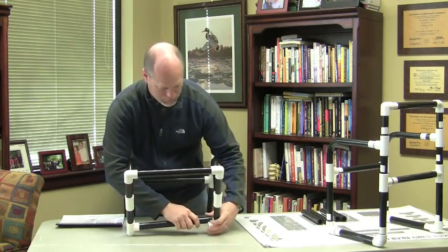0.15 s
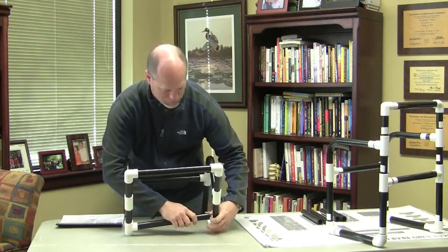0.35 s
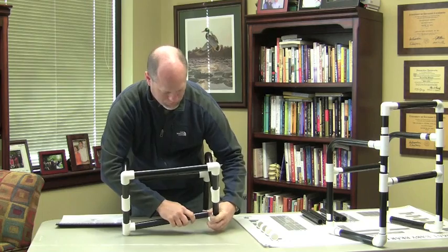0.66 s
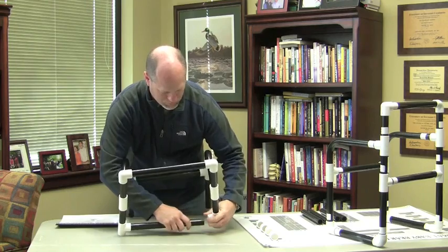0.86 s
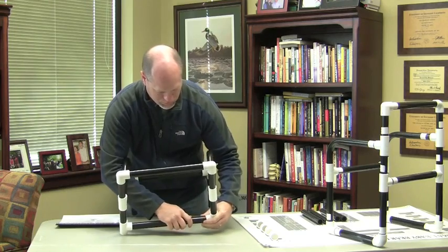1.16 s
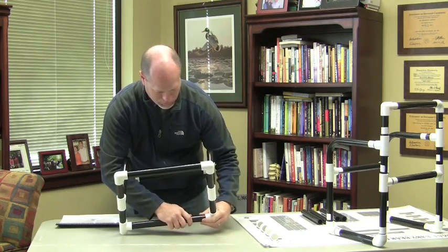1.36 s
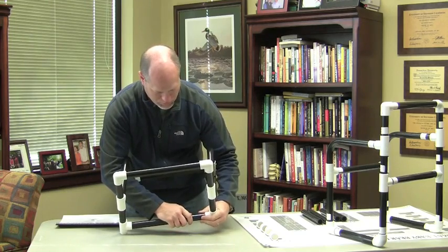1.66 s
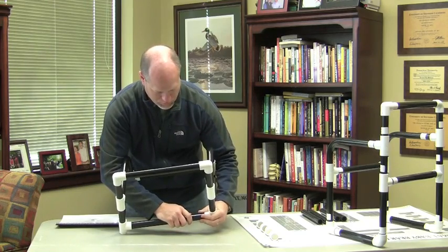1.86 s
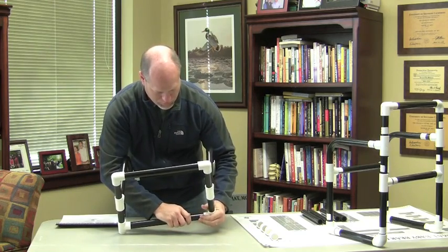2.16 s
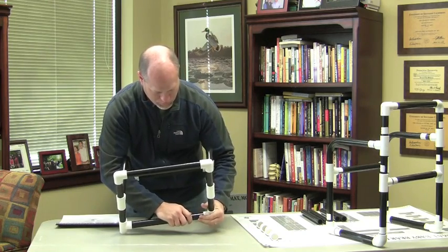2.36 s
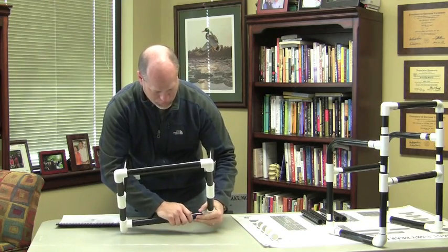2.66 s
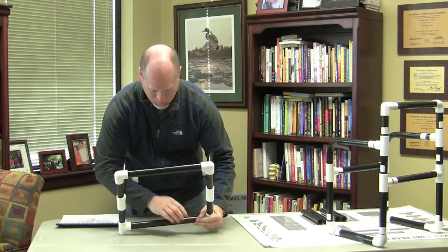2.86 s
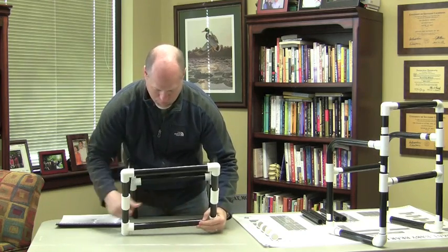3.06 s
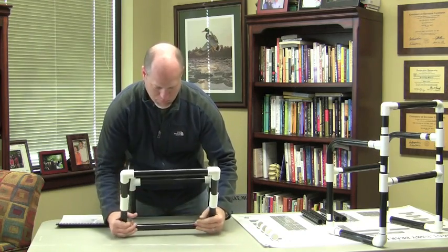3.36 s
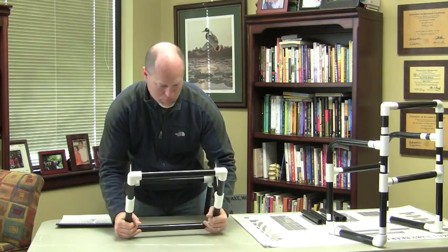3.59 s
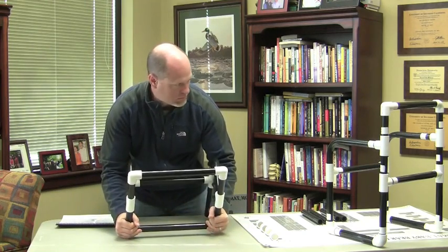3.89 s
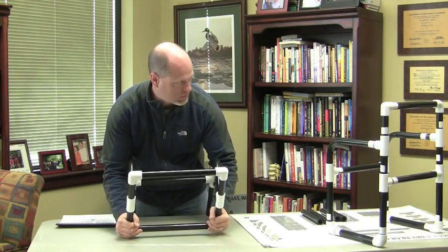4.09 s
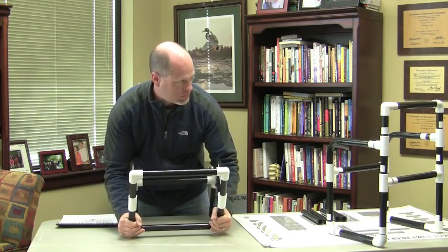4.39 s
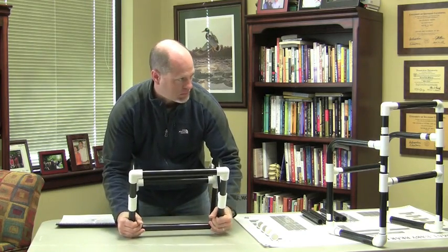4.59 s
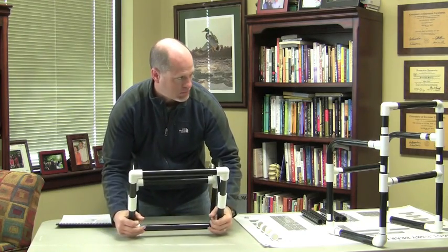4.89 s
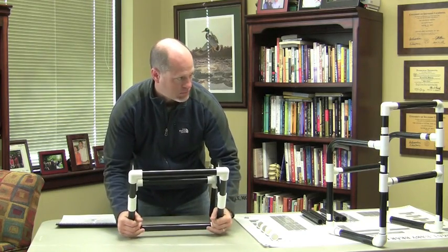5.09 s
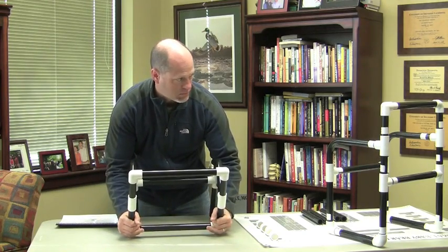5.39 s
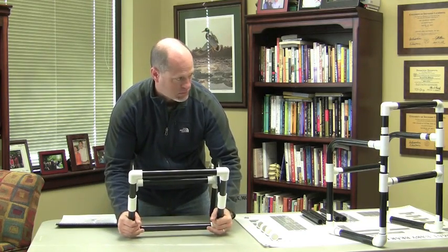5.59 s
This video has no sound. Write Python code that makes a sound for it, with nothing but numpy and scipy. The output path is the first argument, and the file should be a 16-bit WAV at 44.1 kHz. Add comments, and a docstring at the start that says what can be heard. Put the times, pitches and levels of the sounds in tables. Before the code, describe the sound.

A mono recording from across a small office, with a steady low ventilation rumble, faint motor hum and soft hiss. At about 0.1 s a dragged foot gives a tiny falling judder on the table. Plastic joints click, growing into a tight cluster of sharp cracks at 0.7-0.85 s, then a heavy hollow knock with quick follow-ups at 0.95-1.0 s. Smaller snaps scatter at 1.2-1.65 s, and a quieter gap follows. A strong crack and thump lands at 2.35 s, lighter clicks at 2.55 s, a knock at 2.8 s and another snap near 3.1 s. Blunt feet land in a rapid clatter around 3.4 s. Lighter snaps at 3.65-3.95 s lead to a final flurry at 4.2-4.35 s. Afterwards only faint ticks and small taps around 4.65 and 5.1 s remain. Sleeves rustle faintly throughout; thumps are boxy and brief, with short room reflections.

```python
"""Plastic pipes on a folding table

Place: a small office, where a frame of plastic pipes is pushed together by hand on a folding table.
Joints slip and snap as cracks with damped pipe ring; feet knock the modes of the hollow table top.
One foot judders, the table sways, and sleeves rustle as shaped noise; ventilation is noise with hum.
Distance: far enough that each click holds more room than direct sound. One small microphone, mono."""
import sys
import numpy as np
from scipy import signal
from scipy.fft import rfft, irfft, next_fast_len
from scipy.io import wavfile

SR = 44100
rng = np.random.default_rng(int(sys.argv[2]) if len(sys.argv) > 2 else 0)


def unload_wav(signal):
    """Save mono or channel-first audio to the path in sys.argv[1] as 16-bit WAV at rate SR, clipped to [-1, 1]."""
    wavfile.write(
        sys.argv[1],
        SR,
        np.round(np.clip(np.atleast_2d(signal).T, -1, 1) * 32767).astype(np.int16),
    )


N = 253134  # length of the scene in samples
RING = 32768  # longest ring or echo of one contact in samples

# a stronger snap is slightly brighter: contact hardness at the reference level, and its rise
SNAP_HARDNESS_HZ, SNAP_REFERENCE_DB, HARDNESS_OCTAVES_PER_DB = 3750, -31.5, 0.01
# a joint gives a little just before it snaps: typical lead, and level against the snap
FIRST_GIVE_S, FIRST_GIVE_DB = 0.0032, -11

# Joints slipping and snapping. Each row: start in seconds, pipe click in relative dB,
# table thump in relative dB.
JOINT_SNAPS = [(.059, -41, -29.5), (.308, -35, -25), (.4435, -23, -23.5), (.555, -27.5, -25),
               (.695, -35, -35), (.743, -29.5, -23), (.8, -28.5, -45), (.823, -21.5, -23.5),
               (.832, -28.5, -29), (1.169, -39, -26.5), (1.386, -26.5, -26.5), (1.5305, -29, -29.5),
               (1.571, -29, -25), (1.631, -32.5, -26), (1.645, -31, -25), (1.663, -26.5, -23.5),
               (2.344, -21, -22.5), (2.352, -22, -13), (2.5395, -24, -32.5), (2.554, -25, -44),
               (3.07, -27.5, -18.5), (3.156, -41.5, -38), (3.657, -37.5, -25), (3.748, -31, -32.5),
               (3.807, -36.5, -27.5), (3.852, -25, -22.5), (3.941, -37.5, -26.5), (4.076, -39.5, -31.5),
               (4.18, -34, -45), (4.192, -28, -24), (4.256, -34.5, -30), (4.288, -26.5, -23.5),
               (4.308, -31.5, -22), (4.335, -23, -21), (4.42, -42.5, -28.5)]


def joints(crack, pipes, table, click_db=30.5, thump_db=31, click_wet_db=5, thump_wet_db=2):
    """Pipes give a little, then snap deeper into their fittings; each snap jolts the table."""
    out = np.zeros(N + RING)
    for start_s, pipe_db, table_db in list(JOINT_SNAPS) + ticks():
        tail = office()
        octaves = HARDNESS_OCTAVES_PER_DB * (pipe_db - SNAP_REFERENCE_DB)
        hardness_hz = SNAP_HARDNESS_HZ * 2 ** octaves
        first_give = (FIRST_GIVE_S * rng.uniform(0.7, 1.3), FIRST_GIVE_DB, office())
        snap = (0, 0, tail)
        for lead_s, jerk_db, echoes in (first_give, snap):
            click = pipe_click(crack, pipes, echoes, click_wet_db)
            click = soften(click, hardness_hz, order=2)
            add(out, start_s - lead_s, from_db(pipe_db + jerk_db + click_db) * click)
        thump = in_room(strike(table, spread_db=1.5), tail, thump_wet_db)
        add(out, start_s, from_db(table_db + thump_db) * thump)
    return out[:N]


# the strained joints also tick: rate, end, then levels on the scale of the snaps
TICKS_PER_S, TICKS_END_S = 4.5, 4.9
TICK_DB, TICK_SPREAD_DB, TICK_THUMP_DB = -51.5, 5, -44.5


def ticks():
    """Faint slips, one at a random moment of each equal time slot, as rows like those of the snaps."""
    count = int(TICKS_PER_S * TICKS_END_S)
    when, size = rng.random((count, 2)).T
    start_s = (np.arange(count) + when) / TICKS_PER_S
    size_db = TICK_SPREAD_DB * (2 * size - 1)
    return list(zip(start_s, TICK_DB + size_db, TICK_THUMP_DB + size_db))


# Feet knocking on the table. Each row: start in seconds, pipe click in relative dB,
# table thump in relative dB, contact hardness in Hz, thump tilt in dB per octave.
FOOT_KNOCKS = [(0.086, -43, -30, 1200, 2), (0.199, -49, -28.5, 1470, -1), (.947, -27.5, -9.5, 3550, -1),
               (.962, -39, -12.5, 4200, -2.5), (.988, -39, -18.5, 4200, 1), (1.018, -36, -16.5, 2680, 3.5),
               (1.221, -32.5, -22, 2100, 2), (2.411, -48, -20, 3040, -6), (2.814, -29, -11.5, 3660, -1),
               (2.866, -44.5, -22, 3330, 1), (3.099, -47, -20, 4000, -1.5), (3.361, -22, -11, 2200, 1.5),
               (3.389, -31.5, -12.5, 2100, 2.5), (3.42, -40, -20.5, 2000, 2.5), (3.466, -35, -19, 2760, -3),
               (4.653, -41.5, -34, 2230, 7.5), (5.051, -49, -33.5, 2310, -2),
               (5.118, -43.5, -33, 2200, 4.5)]


def feet(crack, pipes, table, click_db=31, thump_db=30.5, click_wet_db=3, thump_wet_db=-1):
    """Blunt fittings land on the hollow top; where they land tilts the thump from boom to clack."""
    out = np.zeros(N + RING)
    # height of each table mode above the lowest
    octaves = np.log2(np.array(TABLE_TOP_MODES)[:, :1] / TABLE_TOP_MODES[0][0])
    for start_s, pipe_db, table_db, hardness_hz, tilt_db in FOOT_KNOCKS:
        tail = office()
        click = pipe_click(crack, pipes, tail, click_wet_db)
        click = soften(click, hardness_hz, order=3, grit_db=-24.5, bounce=0.24)
        thump = strike(table * from_db(tilt_db * octaves), spread_db=2.5, together=0.13)
        add(out, start_s, from_db(pipe_db + click_db) * click)
        add(out, start_s, from_db(table_db + thump_db) * in_room(thump, tail, thump_wet_db))
    return out[:N]


# The dry crack of a contact. Each row: frequency in Hz, relative level in dB.
CRACK_SPECTRUM = [(150, -7), (500, -7.5), (1000, 1), (1700, 2.5), (2700, 2.5), (4000, 3), (6000, 3),
                  (8000, -0.5), (11000, -2.5), (16000, -8.5)]


def dry_crack():
    """The broadband pulse of two hard surfaces meeting."""
    return pulse(CRACK_SPECTRUM)


# Pipe walls and fittings, heavily damped. Each row: frequency in Hz, relative level in dB,
# 60 dB decay time in seconds.
PIPE_WALL_MODES = [(990, -22, 0.0082), (1117, -2.5, 0.028), (1250, -3.5, 0.026), (1450, -18, 0.032),
                   (1940, -4.5, 0.0066), (2096, 1, 0.038), (2680, -2.5, 0.016), (3020, -15, 0.03),
                   (4050, 2, 0.0081), (4340, 13.5, 0.005), (5500, 11, 0.0012), (6380, 9.5, 0.0089)]


def pipe_walls():
    """The short resonances of the plastic walls."""
    return mode_shapes(PIPE_WALL_MODES)


# The hollow table top. Each row: frequency in Hz, relative level in dB, 60 dB decay time in seconds.
TABLE_TOP_MODES = [(118, -25, 0.073), (136.5, -1.5, 0.15), (157.7, -1.5, 0.21), (175, -6, 0.22),
                   (195.8, 3.5, 0.13), (217.4, -2, 0.17), (243.8, 4.5, 0.16), (267.5, -4, 0.24),
                   (297.2, 3, 0.1), (327.3, 3.5, 0.11), (360.3, -1.5, 0.13), (413.5, -6.5, 0.14),
                   (445, -2.5, 0.071), (497, -1.5, 0.062), (553, -7, 0.075), (628, -2.5, 0.031),
                   (722, -9, 0.045), (808, -2, 0.016), (816, -6, 0.043), (978, -15, 0.062)]


def table_top():
    """The bending resonances of the table top."""
    return mode_shapes(TABLE_TOP_MODES)


def pipe_click(crack, pipes, tail, wet_db, ring_db=-5, room_ring_db=-14):
    """A crack with a short pipe ring; the room gathers all directions, which evens out the ring."""
    ring = strike(pipes, spread_db=7.5)
    near = crack + from_db(ring_db) * ring
    direct = unit_energy(signal.fftconvolve(near, slips())[:RING])
    all_round = crack + from_db(room_ring_db) * ring
    diffuse = unit_energy(signal.fftconvolve(all_round, tail)[:RING])
    return direct + from_db(wet_db) * diffuse


def slips(spread_s=0.0016, follow_db=-7, count=9):
    """A contact gives way in one jerk followed by a flurry of smaller ones."""
    force = np.zeros(RING // 8)
    later = (rng.exponential(1, count) * spread_s * SR).astype(int) + 1
    later = np.minimum(later, len(force) - 1)
    force[later] = from_db(follow_db) * (2 * rng.random(count) - 1)
    force[0] = 1
    return force


def soften(click, hardness_hz, order, grit_db=-28, grit_hz=7000, bounce=0, width_octaves=0.39):
    """A softer contact loses its treble, bar a trace of grit; a springy one resonates at the edge."""
    hz = np.geomspace(100, SR / 2, 60)
    spring = 1 + bounce * np.exp(-(np.log2(hz / hardness_hz) / width_octaves) ** 2)
    grit = from_db(grit_db) ** 2 / (1 + (hz / grit_hz) ** 2) ** 2
    kept_power = spring / (1 + (hz / hardness_hz) ** (2 * order)) + grit
    contact = pulse(np.column_stack([hz, 10 * np.log10(kept_power)]))
    return unit_energy(signal.fftconvolve(click, contact)[:RING])


# a foot judders: first slip, spacing, pitch of the first slip and fall from slip to slip, level
JUDDER_START_S, JUDDER_GAP_S, JUDDER_HZ, JUDDER_FALL_HZ, JUDDER_DB = 0.074, 0.013, 518, 45, -2.5


def judder(t60=0.053, wet_db=-3, count=3):
    """A dragged foot sticks and slips; each slip rings the leg, lower as it is pressed down."""
    out = np.zeros(N + RING)
    for k in range(count):
        leg = mode_shapes([(JUDDER_HZ - k * JUDDER_FALL_HZ, 0, t60)])[0]
        slip = in_room(leg, office(), wet_db)
        add(out, JUDDER_START_S + k * JUDDER_GAP_S, from_db(JUDDER_DB) * slip)
    return out[:N]


# The lowest sway of the table on its legs. Each row: frequency in Hz, relative level in dB,
# 60 dB decay time in seconds before the closing fade.
SWAY_MODE = [(69.3, -25, 1.8)]


def table_sway(level_db=-5, give=0.95):
    """Listed snaps and knocks set the table swaying; hard blows are partly taken up by the legs."""
    out = np.zeros(N + RING)
    sway = mode_shapes(SWAY_MODE)[0] * np.linspace(1, 0, RING)
    for start_s, _, table_db, *_ in list(JOINT_SNAPS) + list(FOOT_KNOCKS):
        strength = 1 - 0.5 * rng.random()
        add(out, start_s, from_db(level_db + give * table_db) * sway * strength)
    return out[:N]


# time constants of the rustle, and its floor while the hands hold still
GRIP_ATTACK_S, GRIP_RELEASE_S, RESTING_DB = 0.032, 0.064, -65

# The hands shift their grip and the sleeves rub. Each row: start in seconds, length in seconds,
# level in dB before the uneven catching.
GRIP_SHIFTS = [(.06, .025, -44), (.2, 0.87, -51), (2.15, 0.47, -64), (3.14, 0.46, -54), (3.48, 0.18, -48.5),
               (3.865, 0.44, -56), (4.546, 0.14, -54), (4.737, 0.085, -52), (4.95, 0.41, -59)]
# Colour of the rub. Each row: frequency in Hz, relative level in dB per Hz.
RUB_SPECTRUM = [(200, 9), (700, -0.5), (3000, 0), (6000, -12.5), (10000, -31), (16000, -31)]


def sleeves(grain_db=3, grain_s=0.003):
    """Each shift of grip swells, holds and fades; cloth and skin catch unevenly."""
    t = np.arange(N) / SR
    motion = from_db(RESTING_DB)
    for start_s, length_s, db in GRIP_SHIFTS:
        before = np.maximum(start_s - t, 0) / GRIP_ATTACK_S
        after = np.maximum(t - start_s - length_s, 0) / GRIP_RELEASE_S
        motion = np.maximum(motion, from_db(db) * np.exp(-(before + after)))
    catch = np.interp(t / max(grain_s, 1 / SR), np.arange(N), 2 * rng.random(N) - 1)
    return motion * from_db(grain_db * catch) * coloured_noise(RUB_SPECTRUM)


# Reverberation of the office. Each row: frequency in Hz, 60 dB decay time in seconds.
ROOM_DECAY = [(80, 0.42), (250, 0.43), (600, 0.29), (1500, 0.2), (4000, 0.18), (8000, 0.16), (15000, 0.18)]


def office(build_s=0.00073, late_db=-24, late_t60=0.66, first_echoes_per_s=3200, mixing_s=0.075):
    """Reflections of one contact, sparse then dense; decay varies with pitch, a faint tail lingers."""
    t = np.arange(RING) / SR
    hz = np.fft.rfftfreq(RING, 1 / SR)
    # echoes per sample grow with the square of time
    density = np.clip(first_echoes_per_s / SR + (t / mixing_s) ** 2, 1 / SR, 1)
    echoes = rng.standard_normal(RING) * (rng.random(RING) < density) / np.sqrt(density)
    tail = echoes * from_db(late_db - 60 * t / late_t60)
    spectrum = rfft(echoes)
    band_hz = np.array(ROOM_DECAY)[:, 0]
    for (_, t60), own in zip(ROOM_DECAY, np.eye(len(ROOM_DECAY))):
        band = at_hz(np.column_stack([band_hz, own]), hz)
        tail = tail + irfft(spectrum * band, RING) * np.exp(-np.log(1000) * t / t60)
    return unit_energy(tail * (1 - np.exp(-t / build_s)))


def in_room(sound, tail, wet_db):
    """Direct sound plus its reflections, at unit energy."""
    reflections = signal.fftconvolve(sound, tail)[:RING]
    return unit_energy(sound + from_db(wet_db) * reflections)


AIR_DB = -37  # rms of the air noise ahead of the microphone

# Ventilation and microphone hiss. Each row: frequency in Hz, relative level in dB per Hz.
AIR_SPECTRUM = [(15, -49), (25, -20.5), (92, -10.5), (114, -10.5), (149, -7), (190, 1), (249, -3),
                (270, -14), (301, -6), (335, -13.5), (384, -13), (560, -20.5), (1230, -31), (1840, -37),
                (16000, -53)]
# Fan motor. Each row: frequency in Hz, level in dB rms ahead of the microphone.
FAN_HUM = [(119.5, -47.5), (240, -51)]


def ventilation():
    """Duct rumble and hiss as steady noise, with the fan motor's hum as sines."""
    t = np.arange(N) / SR
    hum = 0
    for hz, db in FAN_HUM:
        hum = hum + from_db(db) * np.sqrt(2) * np.sin(2 * np.pi * (hz * t + rng.random()))
    return from_db(AIR_DB) * coloured_noise(AIR_SPECTRUM) + hum


def mode_shapes(modes):
    """One decaying sine per mode of a struck body."""
    t = np.arange(RING) / SR
    return np.array([from_db(db - 60 * t / t60) * np.sin(2 * np.pi * hz * t) for hz, db, t60 in modes])


def strike(shapes, spread_db, together=0):
    """A contact wakes modes with random strengths and signs; a flat push starts more in step."""
    count = len(shapes)
    signs = rng.choice([-1, 1], count) + together
    strengths = from_db(spread_db * rng.standard_normal(count))
    return unit_energy((strengths * signs) @ shapes)


def pulse(spectrum, size=1024):
    """A causal minimum-phase pulse: the given spectrum with its energy as early as possible."""
    level = from_db(at_hz(spectrum, np.fft.rfftfreq(size, 1 / SR)))
    cepstrum = irfft(np.log(level))
    # folding the cepstrum forward in time makes the phase minimal
    cepstrum[1:size // 2] *= 2
    cepstrum[size // 2 + 1:] = 0
    return np.pad(unit_energy(irfft(np.exp(rfft(cepstrum)))), (0, RING - size))


def coloured_noise(spectrum):
    """Steady noise with the given spectrum, rms 1."""
    size = next_fast_len(N)
    shape = from_db(at_hz(spectrum, np.fft.rfftfreq(size, 1 / SR)))
    noise = irfft(rfft(rng.standard_normal(size)) * shape, size)[:N]
    return unit_energy(noise) * np.sqrt(N)


def at_hz(points, hz):
    """Read a table on a log-frequency axis."""
    known_hz, values = np.transpose(points)
    return np.interp(np.log(np.maximum(hz, 1)), np.log(known_hz), values)


def from_db(db):
    """Decibels to amplitude."""
    return 10 ** (np.asarray(db) / 20)


def unit_energy(x):
    """Scale so that the squares sum to one."""
    return x / np.sqrt(np.sum(x ** 2) + 1e-20)


def add(out, start_s, sound):
    """Mix a sound in at the given time."""
    start = int(max(start_s, 0) * SR)
    out[start:start + len(sound)] += sound[:len(out) - start]


def scene(radiation_hz=118):
    """All contacts on the table, then sway, sleeves and ventilation, as one channel."""
    bodies = dry_crack(), pipe_walls(), table_top()
    blows = joints(*bodies) + feet(*bodies) + judder()
    # the table top is too small to radiate much bass
    radiation = signal.butter(5, radiation_hz, "high", fs=SR, output="sos")
    blows = signal.sosfilt(radiation, blows)
    return (blows + table_sway() + sleeves() + ventilation())[None, :]


CUTOFF_HZ = 16000


def record(dry, low_cut_hz=30):
    """The small microphone loses the deepest bass; the top is cut steeply."""
    bass_loss = signal.butter(1, low_cut_hz, "high", fs=SR, output="sos")
    top_cut = signal.ellip(10, 0.1, 80, CUTOFF_HZ, fs=SR, output="sos")
    return signal.sosfilt(top_cut, signal.sosfilt(bass_loss, dry))


dry = scene()
out = record(dry)
unload_wav(out)
```